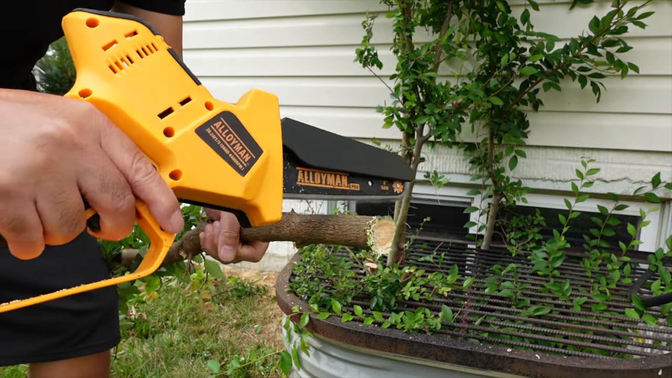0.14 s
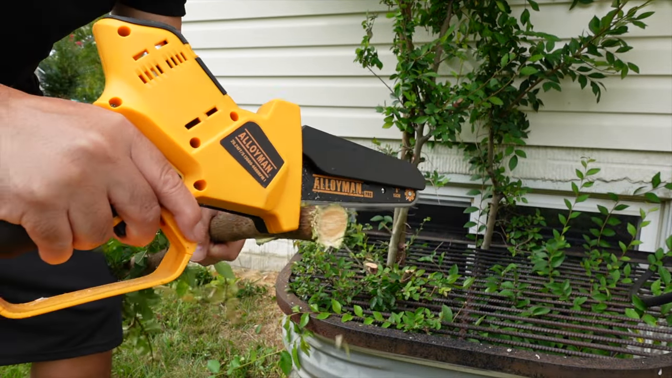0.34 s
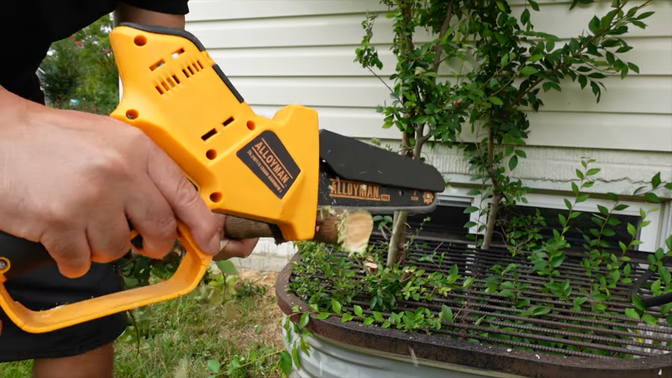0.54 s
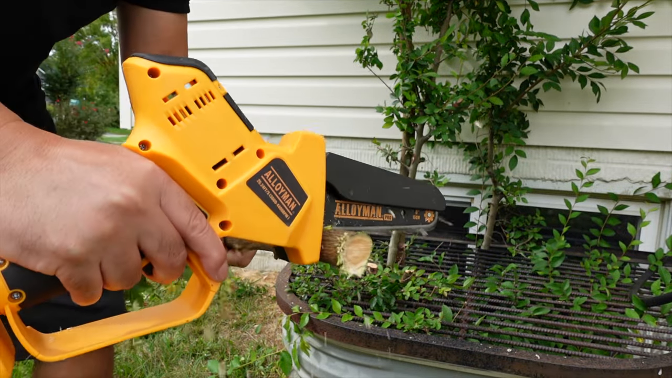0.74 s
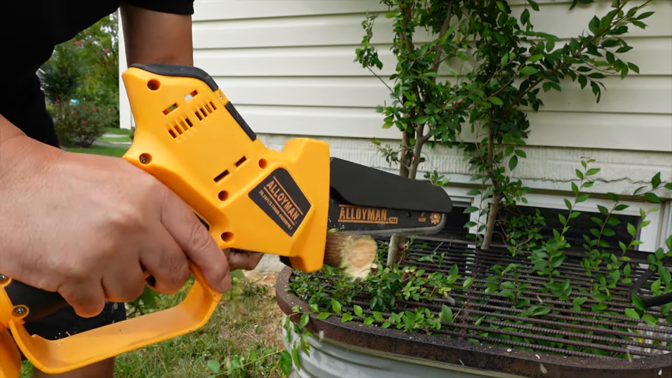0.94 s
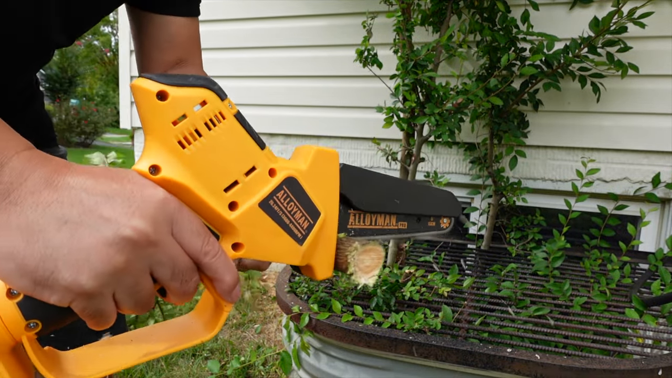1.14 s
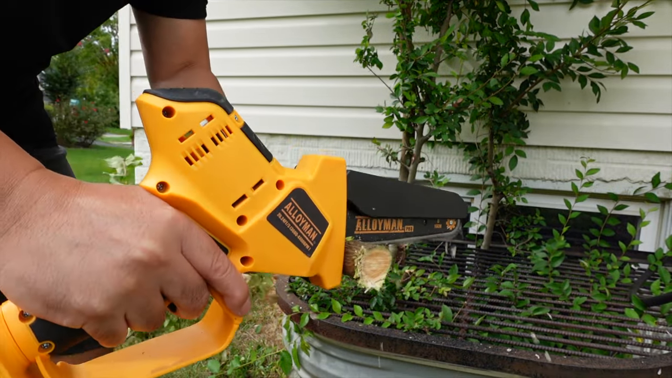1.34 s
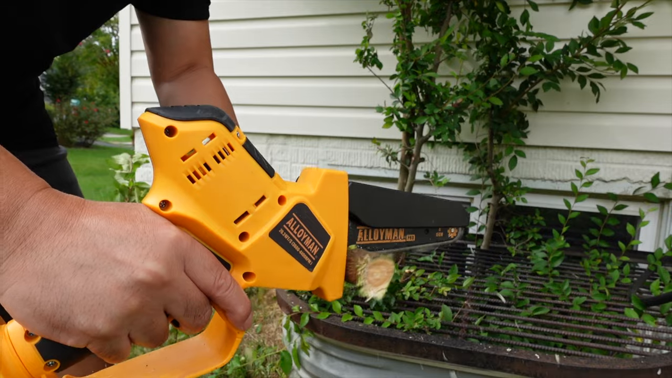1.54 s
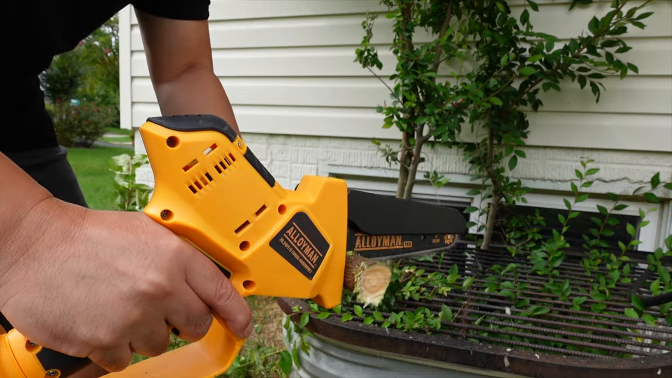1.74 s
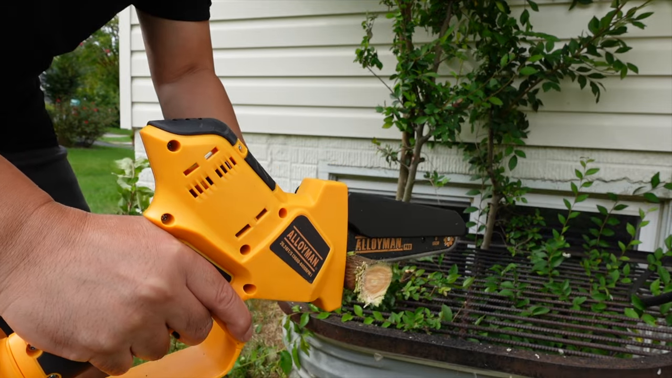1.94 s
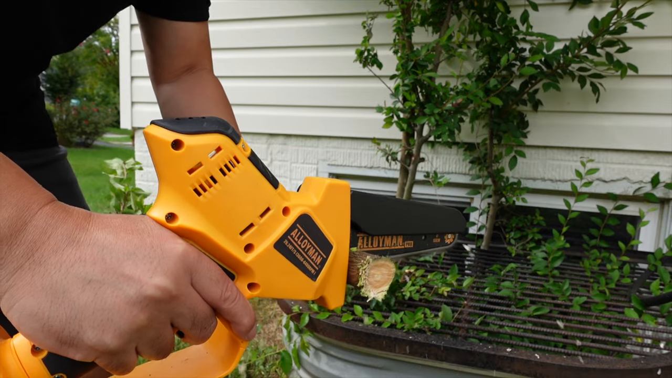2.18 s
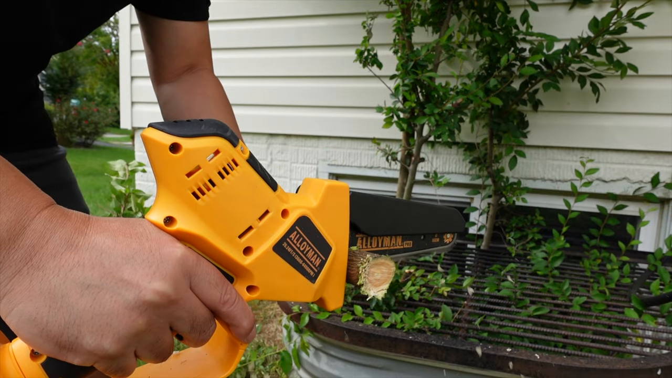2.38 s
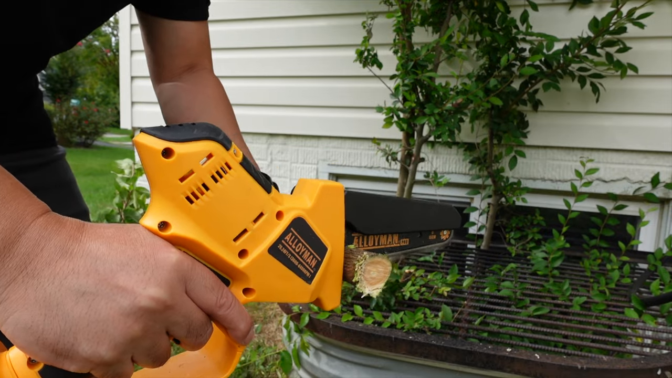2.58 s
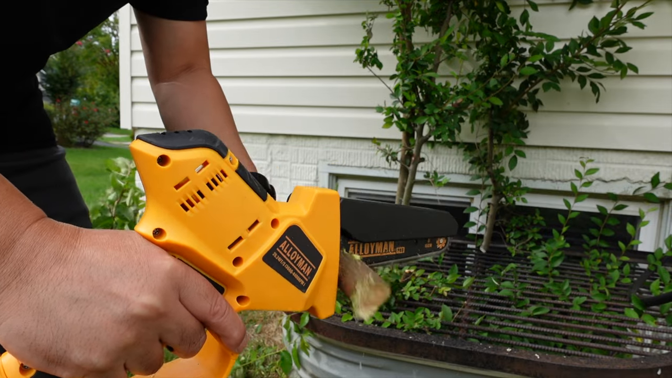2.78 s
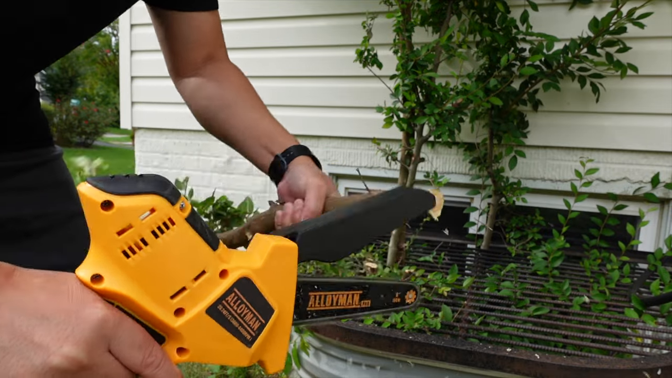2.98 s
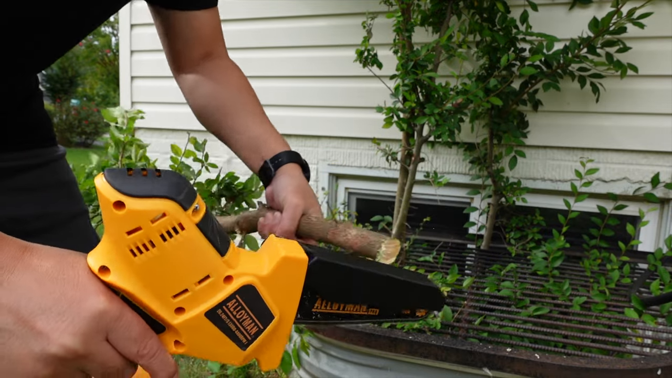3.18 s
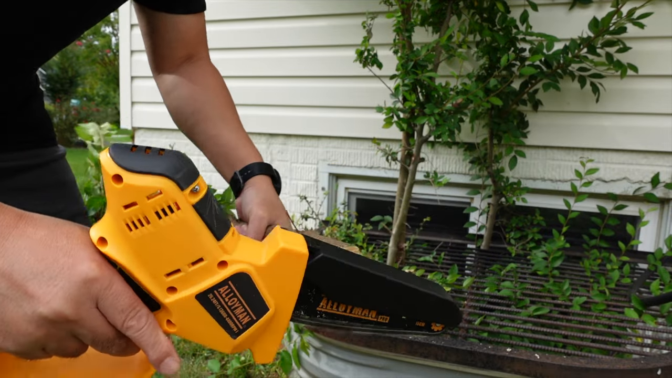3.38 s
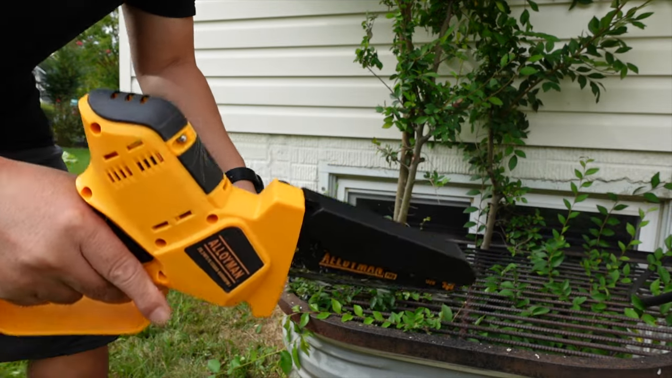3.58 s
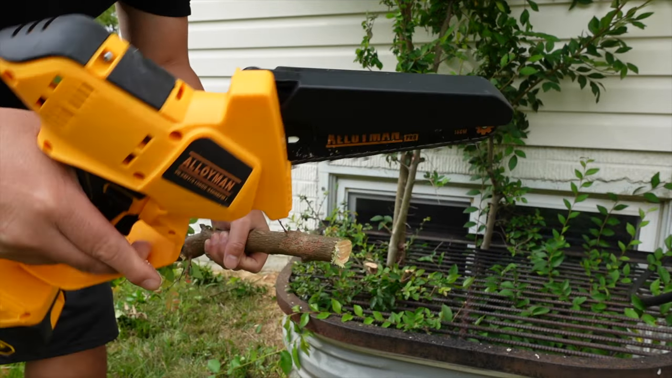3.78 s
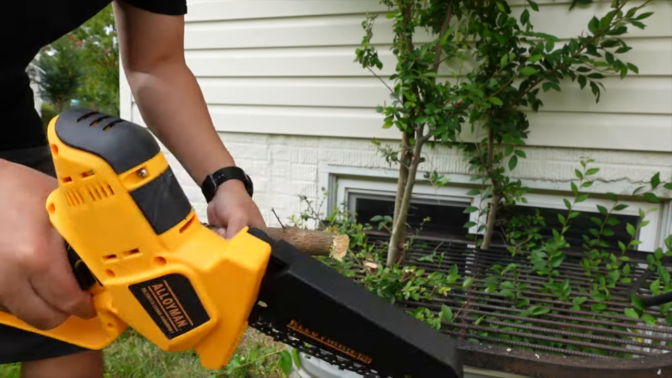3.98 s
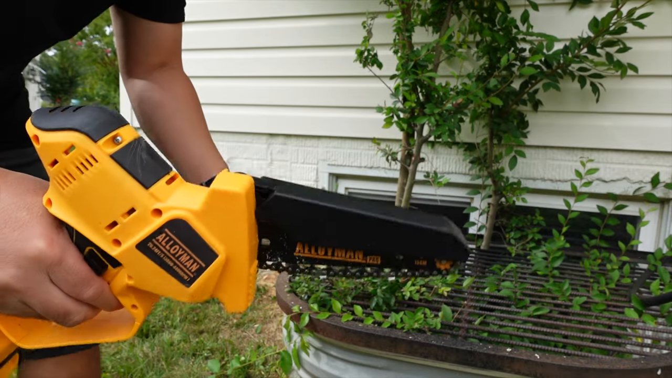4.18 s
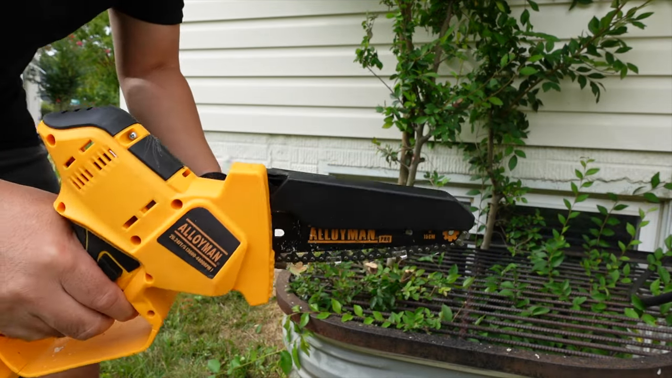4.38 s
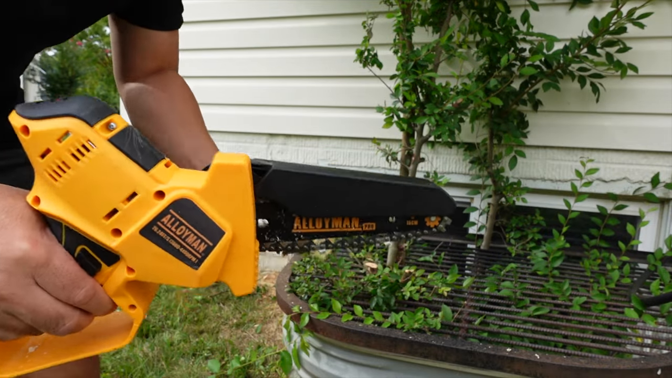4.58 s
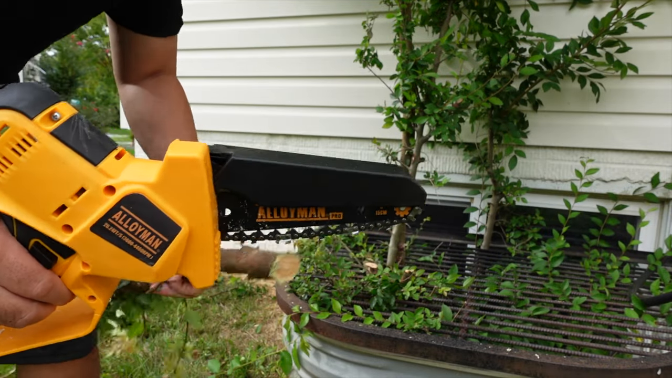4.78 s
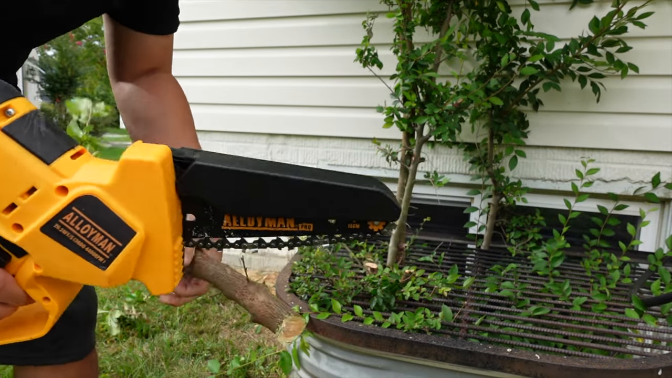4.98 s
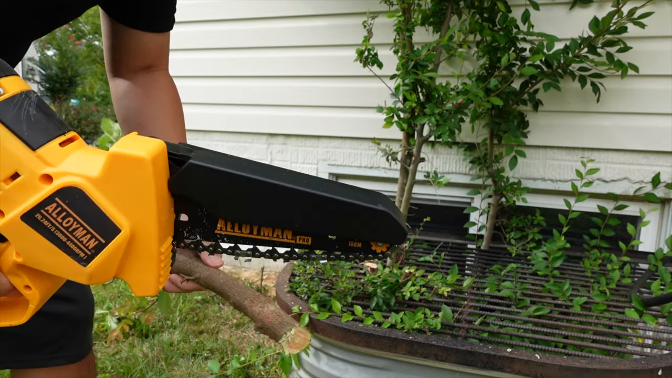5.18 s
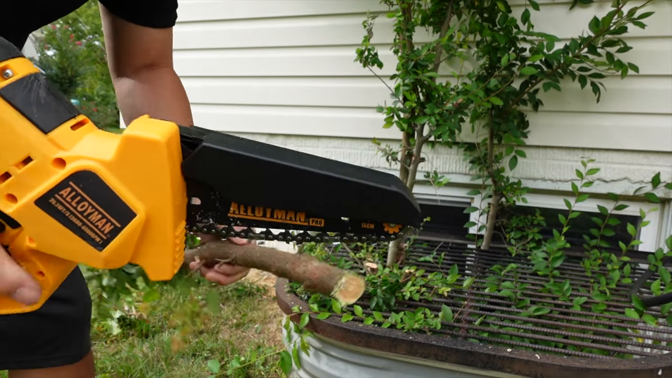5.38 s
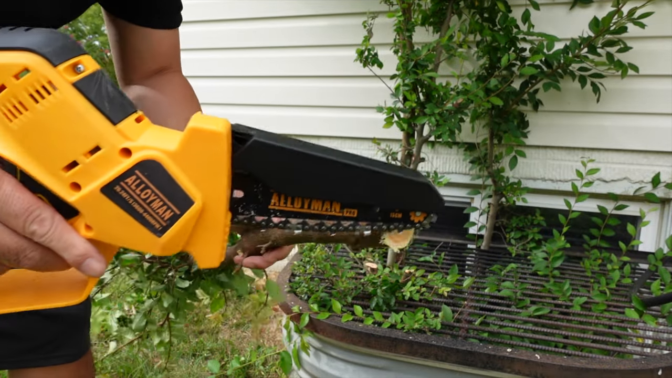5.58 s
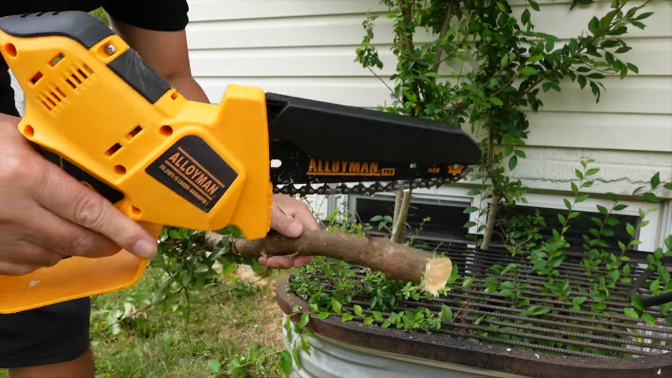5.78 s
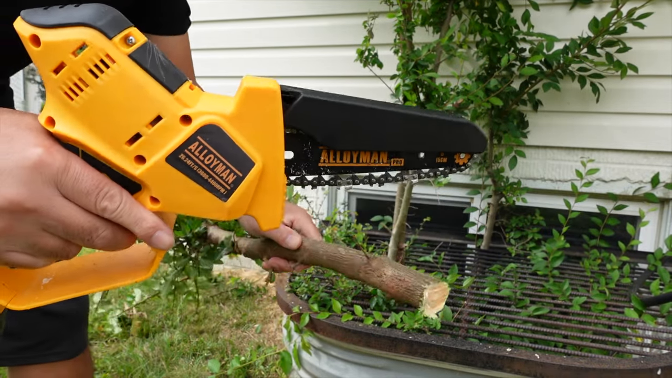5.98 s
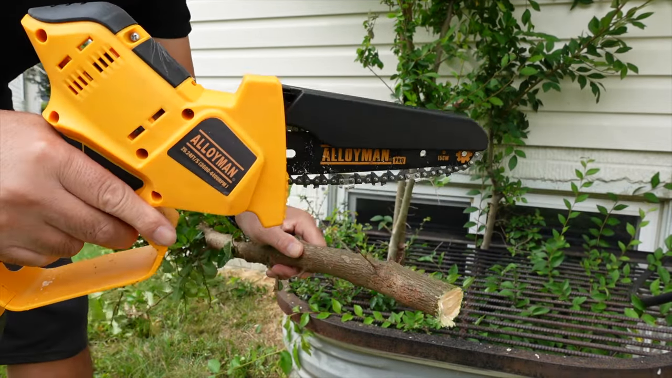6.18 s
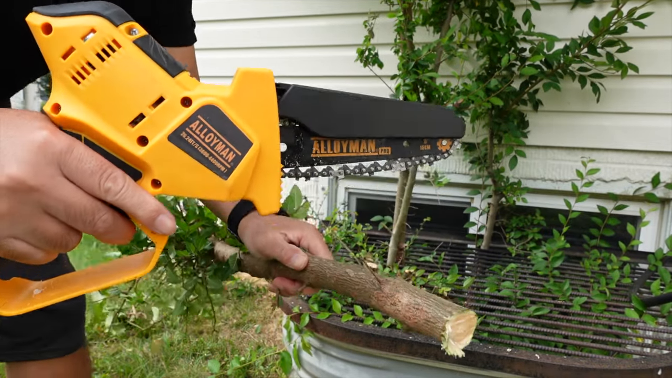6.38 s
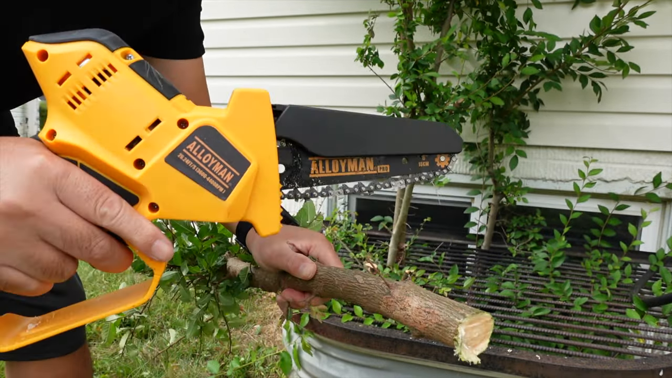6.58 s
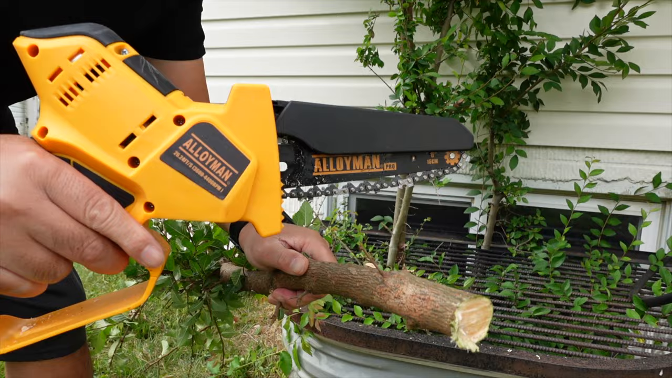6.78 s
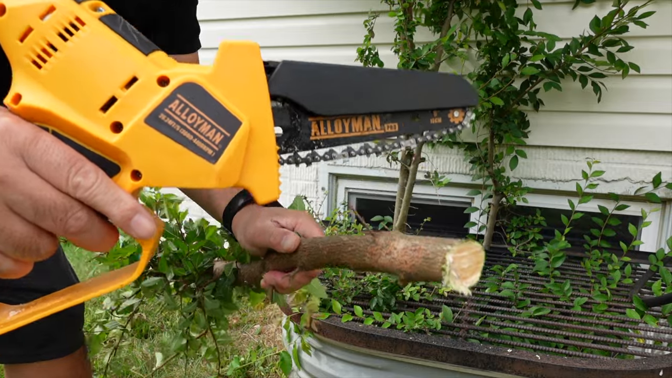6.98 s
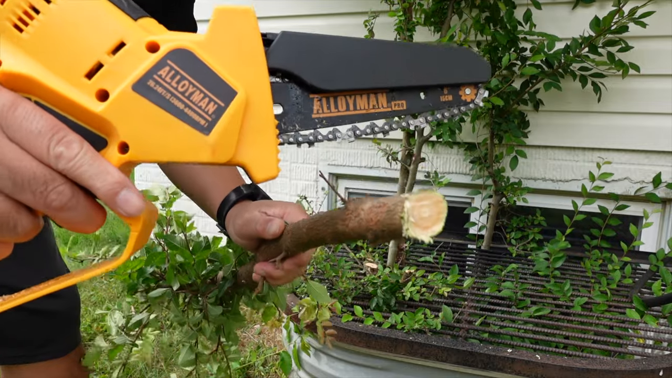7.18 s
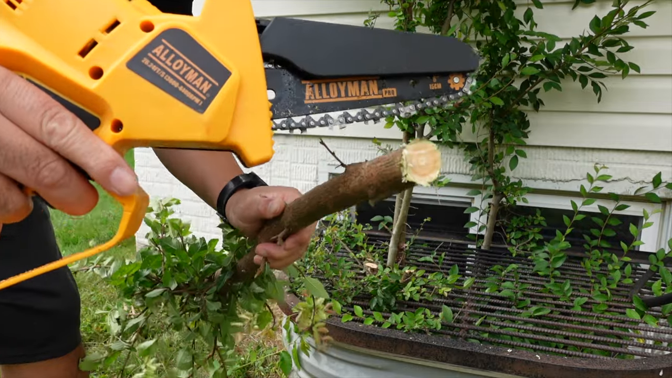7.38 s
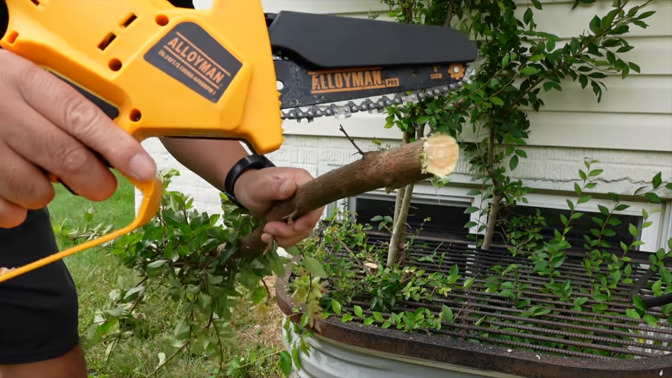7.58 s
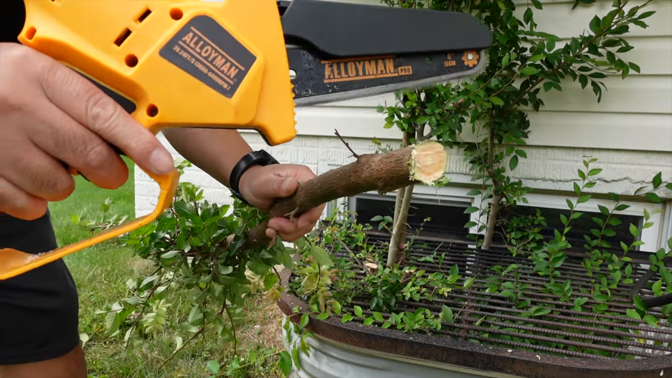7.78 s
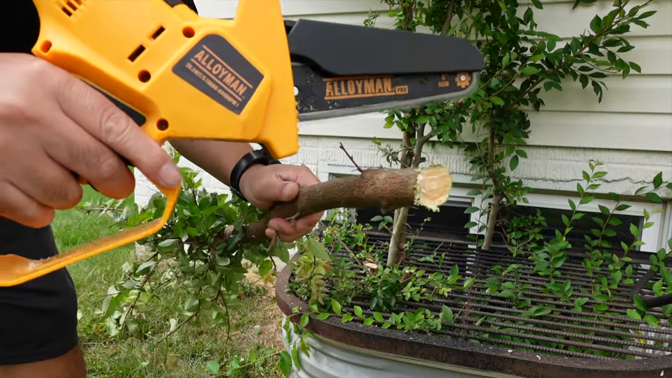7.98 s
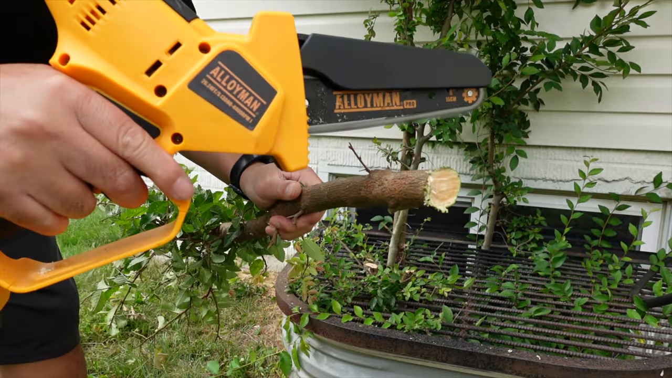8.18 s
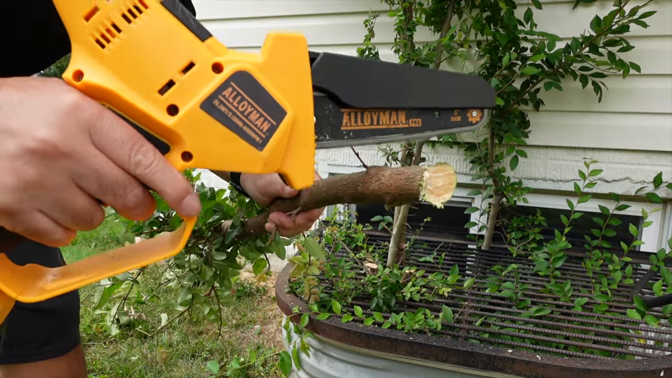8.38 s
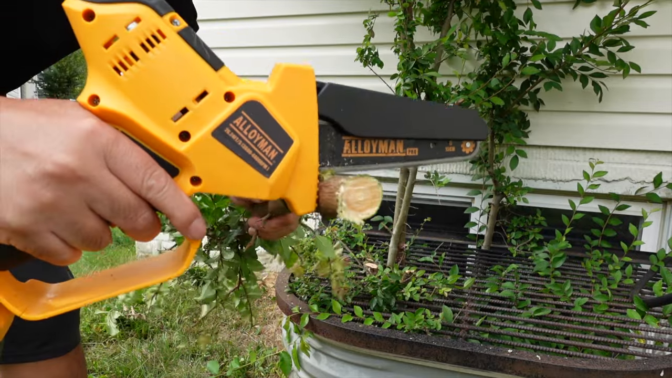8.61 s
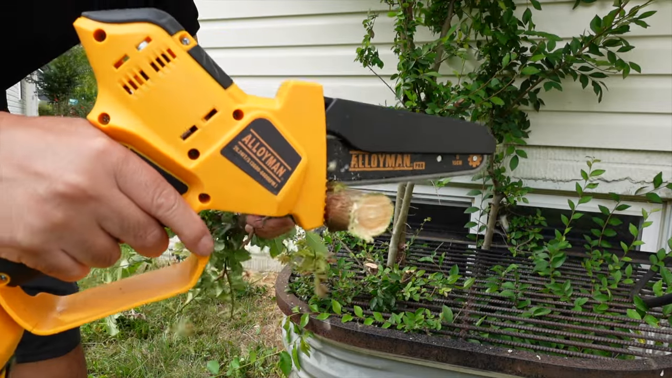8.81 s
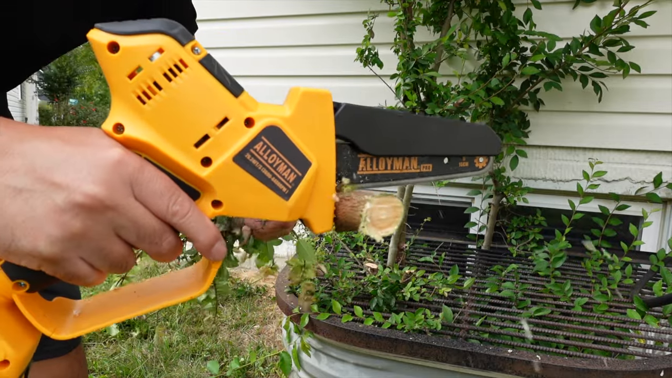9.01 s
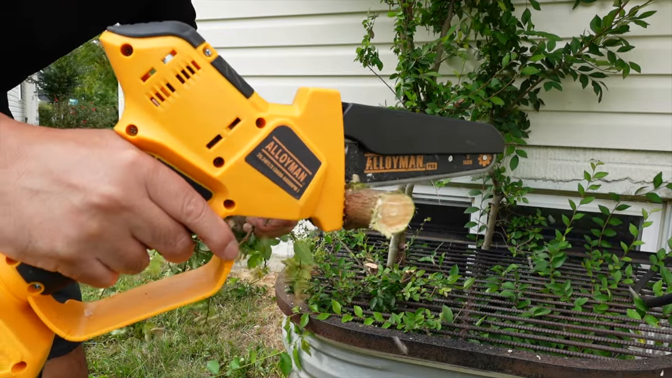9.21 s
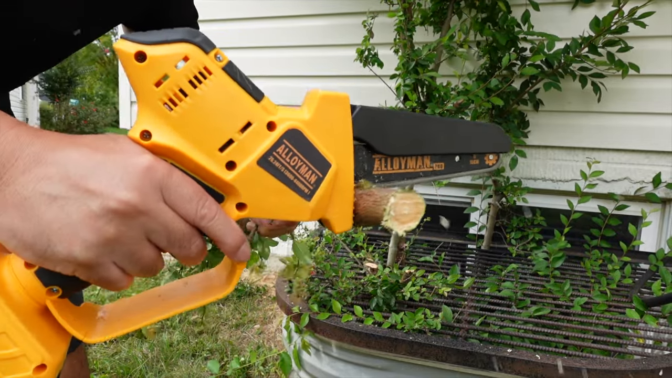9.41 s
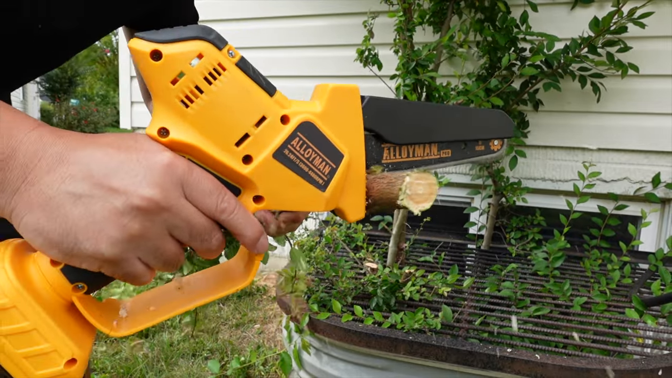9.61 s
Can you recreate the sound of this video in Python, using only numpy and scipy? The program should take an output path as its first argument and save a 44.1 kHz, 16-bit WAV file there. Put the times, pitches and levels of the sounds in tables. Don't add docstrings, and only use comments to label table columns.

```python
import sys
import numpy as np
from scipy import signal
from scipy.fft import rfft, irfft, next_fast_len
from scipy.io import wavfile
from scipy.ndimage import uniform_filter1d, map_coordinates

SR = 44100
rng = np.random.default_rng(int(sys.argv[2]) if len(sys.argv) > 2 else 0)


def wav_record(signal):
    frames = np.transpose(np.atleast_2d(signal))
    bounded = np.clip(frames, -1, 1)
    quanta = np.round(bounded * 32767).astype(np.int16)
    wavfile.write(sys.argv[1], SR, quanta)


def ratio(d):
    e = np.asarray(d, float) / 20
    return 10 ** e


N = 425565
TIME = np.arange(N) / SR

SHAFT_HZ = 250
START_S = 7.745

# (frequency [Hz], level [dB per Hz])
BAR = [
    [(1120, -40.5), (1900, -13.5), (2200, -6.5), (2360, -3), (3700, -2), (4470, -0.5), (6230, -9),
     (7020, -8), (10000, -17.5), (13000, -41.5), (22000, -120)],
    [(1120, -43), (1900, -10.5), (2050, -13), (2490, -3.5), (2940, -2), (3410, 1), (3750, -1), (5780, -4.5),
     (7060, -12), (9010, -9), (10000, -17), (13000, -41.5), (22000, -120)],
    [(1120, -43), (1900, -12.5), (2490, -3.5), (3410, 1.5), (4200, -1), (5780, -7), (6800, -13),
     (8200, -12), (9500, -18.5), (11000, -30), (13000, -41.5), (22000, -120)],
    [(1120, -40), (1900, -6.5), (2180, -13.5), (2410, -5), (2730, -4.5), (3410, 2.5), (3970, -4.5),
     (4960, -4.5), (7210, -9), (8170, -6), (10000, -13.5), (13000, -43), (22000, -120)],
    [(1120, -41), (1900, -10), (2440, -5.5), (2690, -5), (3290, 1), (3860, -4), (4960, -5), (5390, -7.5),
     (8410, -10.5), (10000, -22.5), (13000, -48.5), (22000, -120)],
]
# (frequency [Hz], level [dB per Hz])
WOOD = [(15, -54.5), (25, -32), (91, -37), (120, -37), (311, -20), (525, -0.5), (629, 3), (830, 1.5),
        (901, 2), (1110, -8), (1250, -14.5), (1620, -34.5), (2750, -120)]
# (frequency [Hz], width [Hz], lift [dB])
PLATES = [(644, 50, 1), (1031, 39, 5), (1570, 49, 1.5), (1794, 50, 3), (2343, 62, 1.5), (3420, 100, 2),
          (4077, 82, 2.5), (4480, 80, 3), (4920, 90, 2.5), (5760, 100, 3), (6750, 120, 2.5)]


def unit(x):
    return x / np.sqrt(np.mean(x ** 2) + 1e-20)


def curves(rows, silent=None):
    s, *cols = np.transpose(rows)
    return [np.interp(TIME, s, c, silent, silent) for c in cols]


def wobble(rate):
    coarse = TIME[::16]
    points = rng.standard_normal(int(N * rate / SR) + 4)
    return np.interp(TIME, coarse, map_coordinates(points, [coarse * rate]))


def coloured(x, spectrum, modes=()):
    m = next_fast_len(len(x) + 8192, True)
    f = np.fft.rfftfreq(m, 1 / SR)
    hz, db = np.transpose(spectrum)
    lift_db = sum(lift / (1 + (2 * (f - c) / w) ** 2) for c, w, lift in modes)
    gain = ratio(np.interp(np.log(f + 1), np.log(hz + 1), db) + lift_db)
    return unit(irfft(rfft(x, m) * gain, m)[:len(x)])


def patchy(patchy_db):
    z = signal.stft(rng.standard_normal(N + 512), nperseg=512)[2]
    field = uniform_filter1d(rng.standard_normal(z.shape), size=5, axis=0)
    field = uniform_filter1d(field, size=8, axis=1)
    return signal.istft(z * ratio(patchy_db * unit(field)), nperseg=512)[1][:N]


def hum(hz, width_hz, steady=0):
    turn = 2 * np.pi * hz * TIME
    return unit((steady + wobble(width_hz)) * np.sin(turn) + wobble(width_hz) * np.cos(turn))


def bursts(rate_hz, jitter, decay_s, spread_db):
    turns = np.cumsum(rate_hz) / SR + jitter * wobble(90)
    start = np.diff(np.floor(turns), prepend=0) > 0
    sizes = start * ratio(spread_db * rng.standard_normal(N))
    return unit(signal.lfilter([1], [1, -np.exp(-1 / (decay_s * SR))], sizes))


def add(track, s, sound):
    at = round(s * SR)
    track[at:at + len(sound)] += sound[:N - at]


def tap(hz, t60):
    t = TIME[:SR // 16]
    swing = ratio(-60 * t / t60) * np.sin(2 * np.pi * hz * t)
    return swing / np.abs(swing).max()


def thin(x, hz):
    return signal.sosfilt(signal.butter(4, hz, "high", fs=SR, output="sos"), x)


def blend(rows, count):
    return np.clip(1 - np.abs(curves(rows)[0] - np.arange(count)[:, None]), 0, 1)


def posed(x, shares, spectra):
    sound = np.zeros(N)
    for share, spectrum in zip(shares, spectra):
        seen = np.flatnonzero(share)
        span = slice(seen[0], seen[-1] + 1)
        sound[span] += share[span] * coloured(x[span], spectrum)
    return sound


def saw():
    # (time [s], chain in the wood [0-1])
    wood_contact = [
        (0, 0.16),
        (.33, 0.23),
        (.5, 0.99),
        (2.85, 0.99),
        (3.0, 0.04),
        (8.5, 0),
        (8.75, 1),
        (9.65, 0.99),
    ]
    # (time [s], level [dB], ring time t60 [s])
    switch = (7.7475, -19.5, 0.035)
    load, = curves(wood_contact)
    speed = chain_speed(load)
    drive, bites = chain_drive(speed, load)
    clatter_db, body_db, housing_db, whirr_db = saw_levels(speed)
    clatter, housing = bar_and_housing(drive)
    mix = ratio(1.0) * clatter + ratio(body_db) * low_body(drive, bites, load)
    mix += ratio(housing_db) * housing + ratio(whirr_db) * vent_whirr(drive)
    running = (TIME < 4.07) + np.clip((TIME - 7.752) / 0.0052, 0, 1)
    sound = running * (ratio(clatter_db) * mix + motor(speed, load))
    sound += last_links() + snagging() + branch_growl()
    s, db, t60 = switch
    t = TIME[:SR // 10]
    add(sound, s, ratio(db - 60 * t / t60) * mix[round(s * SR):][:len(t)])
    return sound


def chain_speed(load):
    release_s, coast_s, coast_bend = 3.3, .33, 1.2
    spin_up_s, crawl = .02, .05
    sag, wander = .04, .025
    coast = np.exp(-(np.clip(TIME - release_s, 0, None) / coast_s) ** coast_bend)
    spin_up = 1 - np.exp(-np.clip(TIME - START_S, 0, None) / spin_up_s)
    free = np.where(TIME < START_S, coast, spin_up)
    return np.clip((1 - (sag + wander * wobble(4)) * load) * free, crawl, 1)


def chain_drive(speed, load):
    link_hz, cutter_hz, loop_hz, chip_hz = 405, 135, 6.5, 230
    links = bursts(link_hz * speed, jitter=.07, decay_s=0.0014, spread_db=4.0)
    bites = bursts(cutter_hz * speed, jitter=.15, decay_s=0.0026, spread_db=3.0)
    shaft = 1 + 0.11 * (1 - load) * np.sin(2 * np.pi * np.cumsum(SHAFT_HZ * speed) / SR)
    uneven = ratio(0.4 * wobble(loop_hz) + .8 * wobble(28) + 0.25 * wobble(70))
    chips = bursts(chip_hz * speed, jitter=.9, decay_s=.002, spread_db=4)
    steady_cut = np.where(TIME < START_S, 0.42, 0.15)
    blows = (0.24 - .1 * load + 0.2 * (1 - speed)) * np.clip((speed - .12) / .3, .15, 1)
    cutting = load * (steady_cut * bites + .25 * chips)
    drive = shaft * uneven * (1 - blows + blows * links + cutting)
    evened = drive / np.sqrt(np.abs(uniform_filter1d(drive ** 2, size=SR // 8)) + 1e-9)
    return evened, bites


def saw_levels(speed):
    # (time [s], pressure on the branch [0-1], bar hidden in the cut [0-1])
    cut = [(0, .02, 0.15), (.27, 0, 0.2), (.55, 0.26, 0.37), (1.1, 0.66, 0.48), (1.35, 0.4, 0.83),
           (1.63, 1, 0.78), (2.3, 0.13, 0.24), (2.8, 0.64, 0.16), (2.97, 0.03, 0), (3.2, .01, 0.2),
           (3.5, 0.26, 0), (8.4, 0.11, 0.08), (9.1, 0.69, 0.27), (9.6, 0.82, 0.23)]
    # (time [s], dip [dB])
    stumbles = [
        (3.045, -3.5),
        (3.19, -5),
    ]
    push, buried = curves(cut)
    slow = 1 - speed
    stall_s = np.clip(TIME - 3.933, 0, None) * (TIME < START_S)
    clatter_db = -10 + 1.08 * 20 * np.log10(speed) - 248 * stall_s + 0.18 * push
    clatter_db += sum(db * np.exp(-((TIME - s) / 0.028) ** 2) for s, db in stumbles)
    body_db = -15 + 7 * push + 4 * slow
    housing_db = -11.5 + 3 * push + 5.5 * slow
    whirr_db = -3.5 - 11 * buried - 21 * slow ** 3.5
    return clatter_db, body_db, housing_db, whirr_db


def bar_and_housing(drive):
    # (time [s], pose [number])
    bar_poses = [(.3, 0), (.5, 1), (.92, 1), (1.05, 2), (1.42, 2), (1.55, 3), (1.85, 3), (2.05, 4),
                 (2.8, 4), (3.1, 5), (3.38, 5), (3.7, 6), (6, 6), (6.1, 7), (8.5, 7), (8.85, 8)]
    # (frequency [Hz], level [dB per Hz])
    early_bar = [
        [(1120, -38.5), (1900, -12.5), (2350, -10), (2700, -4.5), (4020, -1), (4400, -4), (5500, -3.5),
         (6050, -9), (6550, -7), (7200, -10), (10000, -16.5), (13000, -44), (22000, -120)],
        [(1120, -38), (1900, -13.5), (2400, -4.5), (3500, -2), (4500, -2), (5050, -4.5), (5600, -5),
         (6100, -10), (7500, -8.5), (8100, -13), (10000, -16), (13000, -43.5), (22000, -120)],
        [(1120, -38.5), (1900, -10.5), (2300, -5.5), (3500, -1.5), (4100, -2.5), (5000, -4.5), (5250, -5.5),
         (6200, -11), (7200, -12), (10000, -16.5), (13000, -44), (22000, -120)],
        [(1120, -37), (1900, -9.5), (2650, -1.5), (3200, -4), (4000, -2), (5000, -5.5), (5700, -8.5),
         (6400, -11.5), (7600, -13.5), (10000, -18), (13000, -44), (22000, -120)],
    ]
    # (frequency [Hz], level [dB per Hz])
    housing_colour = [(650, -41.5), (1100, -7), (1180, -7), (1520, 4.5), (1910, -6.5), (2200, -6),
                      (2860, -30), (4840, -120)]
    housing_faces_db = [2.5, 1, 1.34, 0.6, 0.35, -2.5, 0.5, -0.1, -0.3]
    colours = early_bar + BAR
    shares = blend(bar_poses, len(colours))
    steel = coloured(drive * patchy(0.92), [(20, 0)], PLATES)
    housing = coloured(drive * patchy(1.0), housing_colour, PLATES)
    return posed(steel, shares, colours), ratio(housing_faces_db @ shares) * housing


def low_body(drive, bites, load):
    # (frequency [Hz], level [dB per Hz])
    free_body = [(15, -55), (25, -29), (118, -26), (277, -25), (453, -10.5), (492, -6), (534, -3.5),
                 (598, 1.5), (994, 3.5), (1170, -11), (1250, -1.5), (1620, -31), (2750, -120)]
    thuds = unit(ratio(1.1 * wobble(14)) * (1 + 0.35 * bites))
    free = coloured(drive * patchy(0.77), free_body, PLATES)
    cutting = coloured(thuds * patchy(0.88), WOOD, PLATES)
    return ((1 - load) * free + load * cutting) / np.sqrt((1 - load) ** 2 + load ** 2)


def vent_whirr(drive):
    # (time [s], pose [number])
    vent_poses = [(1.4, 0), (2.0, 1), (2.8, 1), (3.1, 2), (6, 2), (6.1, 3), (8.5, 3), (8.85, 4)]
    # (frequency [Hz], level [dB per Hz])
    whirr_colours = [
        [(5000, -35.5), (8500, -2.5), (11500, -4), (13000, -3), (14200, 4.5), (16000, -3.5)],
        [(5000, -36.5), (8500, -1.5), (11500, -1.5), (13000, 0), (14200, 2.5), (16000, -3)],
        [(5000, -34), (9000, -2.5), (10500, -5), (12500, -4), (14200, 1), (16000, -2.5)],
        [(5000, -35), (8500, -7), (10600, -3), (12600, -1.5), (13800, 3.5), (16000, 2)],
        [(5000, -33.5), (8500, -4), (10600, -4.5), (12600, -3), (14200, 4.5), (16000, 2.5)],
    ]
    air = drive ** 1.3 * patchy(1.7)
    colours = [colour + [(16300, -60)] for colour in whirr_colours]
    return posed(air, blend(vent_poses, len(whirr_colours)), colours)


def motor(speed, load):
    # (multiple of shaft speed, level [dB])
    orders = [(1, -53), (2, -37), (5, -36), (6, -38), (7.2, -36), (10, -34)]
    # (time [s], level [dB])
    opening = [(0, 4), (.38, 4), (.5, 0), (2.8, 0), (3, -2.5), (6, -2.5), (7, .1)]
    drift = 1 + .0015 * wobble(12) + .02 * load * wobble(20)
    turns = np.cumsum(SHAFT_HZ * speed * drift) / SR
    lines = sum(ratio(db - .7 + wobble(12)) * np.sin(2 * np.pi * k * turns) for k, db in orders)
    return np.sqrt(2) * lines * ratio(curves(opening)[0] - 8.7 * load - 81 * (1 - speed))


def last_links():
    # (time [s], peak [dB])
    clanks = [(3.176, 7), (3.7616, -3.5), (3.7968, -13), (3.8694, -9), (3.9028, -8), (3.9131, -13),
              (3.9478, -24), (3.9881, -21), (4.0115, -35), (4.0165, -40), (4.0318, -48)]
    # (time [s], peak [dB])
    rivet_ticks = [(3.6675, -8), (3.7078, -14), (3.751, -15), (3.7721, -19), (3.7818, -23), (3.7937, -21),
                   (3.8104, -19), (3.8206, -22), (3.8338, -21), (3.8509, -25), (3.8669, -28), (3.8838, -30),
                   (3.8995, -27), (3.9031, -22), (3.9133, -25), (3.9192, -28), (3.9603, -33), (3.9701, -40),
                   (3.9906, -45), (4.0159, -50), (4.032, -54), (4.1427, -53)]
    # (frequency [Hz], level [dB per Hz])
    rivet = [(3000, -40), (5500, -8), (7500, 5), (9000, -1), (11500, -11), (14500, -3), (16000, -7)]
    sound, t = np.zeros(N), TIME[:SR // 10]
    clank = coloured(rng.standard_normal(N), BAR[1])
    for s, db in clanks:
        fade = ratio(db - 10.0 - 60 * t / 0.021) * (1 - np.exp(-t / .0004))
        add(sound, s, fade * clank[round(s * SR):][:len(t)])
    tick = coloured(rng.standard_normal(N), rivet)
    for s, db in rivet_ticks:
        add(sound, s, ratio(db - 3 - 60 * t / 0.0095) * tick[round(s * SR):][:len(t)])
    return sound


def snagging():
    # (time [s], peak [dB], frequency [Hz])
    catches = [(0.538, -11.5, 883), (0.582, -11, 809), (0.697, -14, 650), (0.743, -14.5, 678),
               (0.862, -15.5, 694), (0.913, -9.5, 636.4), (1.01, -8.5, 619), (1.082, -6, 729),
               (1.132, -11, 711), (1.177, -6.5, 611), (1.229, -12.5, 619), (1.289, -13, 627),
               (1.379, -8, 580), (1.461, -11, 912), (1.54, -16, 631), (1.558, -7, 532.4),
               (1.695, -8.5, 624), (1.792, -10.5, 650), (2.073, -11.5, 623), (2.111, -12, 666),
               (2.148, -9.5, 689), (2.54, -11.5, 737), (2.61, -16, 737), (2.682, -12.5, 660),
               (2.733, -12, 718), (2.766, -11.5, 633), (2.794, -11.5, 791), (2.818, -7.5, 947),
               (2.852, -12, 921), (2.953, -11, 794),
               (8.688, -13, 778), (8.73, -14, 759), (8.81, -8, 678), (8.839, -20, 754), (8.861, -8, 525),
                  (8.896, -8, 660), (8.941, -14, 662), (8.965, -7, 905), (9.035, -7, 708),
                  (9.055, -11, 549), (9.099, -13, 770), (9.134, -13, 767), (9.209, -3.5, 692),
                  (9.257, -5.5, 553), (9.29, -16, 845), (9.359, -11, 604), (9.42, -15, 651),
                  (9.44, -12, 729), (9.471, -10, 536), (9.526, -12, 886), (9.568, -12, 711)]
    t60, splinter_share, low_share = .045, .3, 0.22
    knock, snags, t = coloured(rng.standard_normal(N), WOOD), np.zeros(N), TIME[:SR // 10]
    for s, db, hz in catches:
        level = ratio(db - 3)
        fade = ratio(-60 * t / .045) * (1 - np.exp(-t / 0.0016))
        blow = fade * np.roll(knock, -round(s * SR))[:len(t)]
        add(snags, s, level * splinter_share * blow / np.abs(blow).max())
        add(snags, s, level * (tap(hz, t60) + low_share * tap(.7 * hz, t60)))
    return thin(snags, 370)


def branch_growl():
    # (time [s], level [dB])
    growl = [(1.52, -50.5), (1.56, -22), (1.74, -22.5), (1.9, -29.5), (1.98, -49.5)]
    return ratio(curves(growl, silent=-120)[0]) * hum(623, 45)


def wind():
    # (time [s], level [dB])
    gusts = [
        [(4.3, -58), (4.446, -50.5), (4.7, -41), (5.106, -52), (5.526, -46), (5.72, -53), (5.85, -63)],
        [(6.4, -56.5), (6.62, -62.5)],
    ]
    # (frequency [Hz], level [dB per Hz])
    buffet = [(15, -57.5), (25, -24.5), (74, -2.5), (124, -0.5), (248, -5.5), (677, -32.5), (719, -25.5),
              (900, -32.5), (1170, -56.5), (1980, -120)]
    # (centre time [s], peak [dB], frequency [Hz])
    thumps = [(4.485, -28, 149), (4.505, -21, 150), (4.522, -20, 210), (4.545, -19, 146), (4.559, -20, 222),
              (4.575, -29, 130), (4.612, -37, 140), (4.685, -42, 150), (4.735, -30, 130), (4.762, -27, 150),
              (4.812, -29, 130), (4.842, -24, 170), (4.9, -30, 120), (4.95, -26, 151), (5.153, -33, 138),
              (5.341, -36, 130), (5.373, -35, 140), (5.41, -29, 150), (5.449, -33, 130), (5.49, -36, 130),
              (5.6, -36, 110), (5.65, -40, 150), (6.48, -41, 120), (6.534, -41, 100)]
    lumps = unit(ratio(3 * wobble(24)) * coloured(rng.standard_normal(N), buffet))
    sound = sum(ratio(curves(rows, silent=-120)[0] - 1.5) for rows in gusts) * lumps
    for s, db, hz in thumps:
        length = 2.9 / hz
        t = TIME[:round(length * SR)]
        turn = 2 * np.pi * hz * (t - length / 2) + rng.uniform(-2.3, 2.2)
        push = np.cos(turn) + 0.2 * np.cos(2.14 * turn) + 0.26 * np.cos(turn / 2)
        add(sound, s - length / 2, ratio(db - 1.0) * np.sin(np.pi * t / length) ** 2 * push)
    return sound


def rustle():
    dull_gain, bright_gain = brushing()
    grains = ratio(2.3 * wobble(300) + .7 * wobble(40))
    dull_colour = [(1200, -41), (2500, -1.0), (3200, -3.0), (5000, -2), (8000, -8.0), (10000, -32.5)]
    bright_colour = [(6500, -25), (8000, -2.5), (11500, -5), (14000, 2.0), (15800, -1), (16200, -62.5)]
    dull = coloured(grains * patchy(3.6), dull_colour)
    bright = coloured(grains * patchy(2), bright_colour)
    return dull_gain * dull + bright_gain * bright


def brushing():
    # (start [s], length [s], level [dB], bright part above it [dB])
    brushes = [(4.34, .08, -72, 8), (4.656, 0.065, -54, -3), (4.75, 0.11, -54, -1), (4.88, .06, -62, -2),
               (4.985, .02, -60, -2), (5.04, .04, -60, 2), (5.16, .05, -60, -4), (5.22, .08, -68, -2.5),
               (5.385, 0.024, -51.5, -4), (5.462, .06, -61, -6.5), (5.675, 0.046, -63, -9),
               (5.761, .5, -66.5, -7), (6.27, .06, -64, -9), (6.67, .06, -58, -11), (6.86, 0.18, -62, -12),
               (7.13, .03, -60.5, -4), (7.2, .1, -72, -7), (7.509, .03, -64, -1.5), (7.55, .04, -71, -2.5)]
    fade_in, fade_out = 800, 600
    dull, bright, t = np.zeros(N), np.zeros(N), TIME[:SR] - .1
    for s, length, db, rel_db in brushes:
        rise_db = np.clip(fade_in * t, None, 0)
        fall_db = np.clip(fade_out * (t - length), 0, None)
        stroke = ratio(db + rise_db - fall_db)
        add(dull, s + t[0], stroke)
        add(bright, s + t[0], ratio(rel_db) * stroke)
    return dull, bright


def twigs():
    # (time [s], peak [dB], frequency [Hz])
    thin_ticks = [(4.494, -47, 12500), (4.831, -33, 5000), (4.875, -41, 7500), (4.921, -39, 6800),
                  (5.181, -39, 4800), (5.22, -44, 9000), (5.255, -45, 10500), (5.275, -48, 12500),
                  (5.3, -48, 12500), (5.375, -42, 7500), (5.805, -46, 4000), (6.18, -50, 13500),
                  (6.19, -49, 13500), (7.085, -48, 13400), (7.187, -48, 7000), (7.265, -49.5, 13000),
                  (7.481, -41.5, 13500), (7.568, -44.5, 6500), (7.688, -42, 2100)]
    # (time [s], peak [dB], frequency [Hz])
    snaps = [
        (4.246, -45, 2506),
        (5.486, -29.5, 2200),
        (5.503, -33, 1300),
        (5.645, -40, 900),
        (5.681, -33.5, 5000),
        (5.715, -29, 3300),
        (5.728, -38, 3000),
        (7.141, -42, 8000),
        (7.514, -44, 5000),
    ]
    # (time [s], peak [dB], frequency [Hz], spread [octaves], ring time t60 [s])
    scrapes = [
        (4.66, -48, 2950, .08, .2),
        (4.831, -44, 2900, .1, .25),
        (5.674, -37, 3300, .4, .02),
        (5.68, -41, 1350, .15, .12),
        (6.925, -43, 4200, .6, .15),
        (5.01, -51, 3600, .06, .3),
        (5.024, -34, 790, 0.28, .3),
        (6.93, -36, 1100, 1.3, .2),
    ]
    # (time [s], peak [dB], frequency [Hz], ring time t60 [s])
    knocks = [
        (4.7555, -25.5, 800, .012),
        (5.4785, -36, 1800, .008),
        (5.487, -34, 1100, .015),
        (5.502, -36, 900, .012),
        (5.6, -42, 550, .03),
        (6.9222, -30, 1000, 0.0062),
        (9.3, -12, 482, 0.037),
    ]
    sound, t = np.zeros(N), TIME[:SR // 4]
    ticks = [(*row, 0.27, 0.017) for row in thin_ticks]
    ticks += [(*row, 0.78, 0.033) for row in snaps]
    for s, db, hz, spread, t60 in ticks + scrapes:
        edges = np.clip(hz * np.exp2(spread * np.array([-1, 1])), 20, SR * .45)
        band = signal.butter(2, edges, "band", fs=SR)
        tick = ratio(-60 * t / t60) * signal.lfilter(*band, rng.standard_normal(len(t)))
        add(sound, s, ratio(db - 2.0) * tick / np.abs(tick).max())
    for s, db, hz, t60 in knocks:
        add(sound, s, ratio(db) * thin(tap(hz, t60), 210))
    return sound


def garden():
    # (frequency [Hz], level [dB per Hz])
    air_colour = [(15, -49), (25, -21.5), (120, -2.5), (190, -8.5), (353, -7), (837, -8.5), (4010, -29.5),
                  (5850, -30), (6350, -32), (13900, -37), (15900, -36.5)]
    # (time [s], level [dB])
    air_db = [(4.05, -52.5), (4.47, -53.5), (5.25, -48.5), (5.44, -52.5), (5.82, -51), (6.54, -53),
              (7.74, -52)]
    # (frequency [Hz], width [Hz], level [dB])
    fan_tones = [(118, 4, 0), (236, 6, -8), (358, 10, -9.5), (680, 10, -16)]
    # (time [s], level [dB])
    fan_db = [(2.5, -65), (3.46, -49), (4.17, -57), (5.55, -56), (5.72, -62), (6.1, -59), (6.45, -60),
              (7.0, -67), (7.25, -57), (7.72, -55.5), (8.0, -59)]
    # (frequency [Hz], width [Hz], level [dB])
    insect = (5800, 250, -80)
    air = ratio(curves(air_db)[0] + 0.5 + .6 * wobble(3.3)) * coloured(patchy(1.2), air_colour)
    tones = sum(ratio(db) * hum(hz, width_hz, steady=4) for hz, width_hz, db in fan_tones)
    fan = ratio(curves(fan_db)[0] + 1.5) * tones
    hz, width_hz, db = insect
    song = ratio(db + 3 * wobble(4)) * np.clip(TIME - 3.9, .2, 1) * hum(hz, width_hz)
    return air + fan + song


def bird():
    # (time [s], level [dB], frequency [Hz], length [s])
    calls = [
        (6.0, -64, 1900, .035),
        (6.064, -67, 1900, .018),
        (6.117, -62, 1870, 0.038),
        (6.225, -66, 1900, .028),
    ]
    sound = np.zeros(N)
    for s, db, hz, length in calls:
        t = TIME[:round(length * SR)]
        syllables = np.abs(np.sin(2 * np.pi * t / length))
        whistle = np.sin(2 * np.pi * hz * t) + .12 * np.sin(4.2 * np.pi * hz * t)
        add(sound, s, ratio(db + 10) * syllables * whistle)
    return sound


def scene():
    return (saw() + wind() + rustle() + twigs() + garden() + bird())[None]


def roll_off(x):
    return signal.sosfilt(signal.butter(12, 16320, fs=SR, output="sos"), x)


def record(dry):
    held = dry / (1 + np.abs(dry / 1.07) ** 5) ** (1 / 5)
    hz = np.fft.rfftfreq(N, 1 / SR)
    kept = np.sin(np.pi / 2 * np.clip((15850 - hz) / 150, 0, 1)) ** 2
    return roll_off(irfft(rfft(held) * kept, N))


dry = scene()
out = record(dry)
wav_record(out)
```